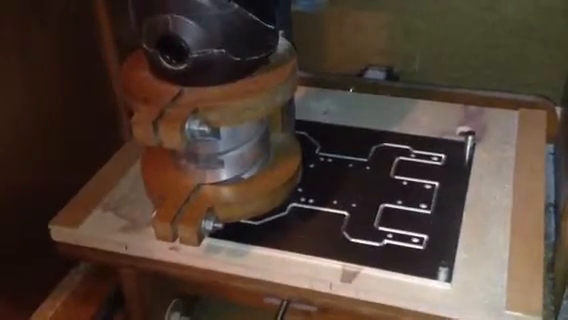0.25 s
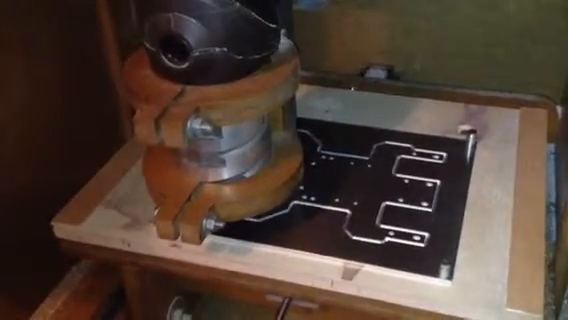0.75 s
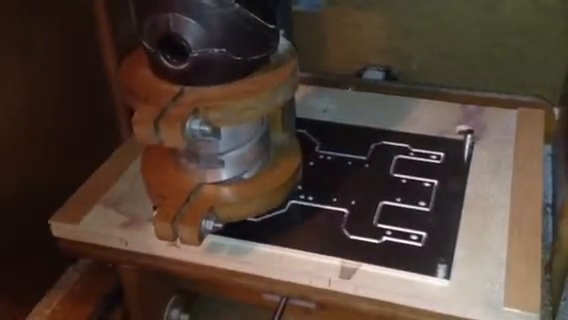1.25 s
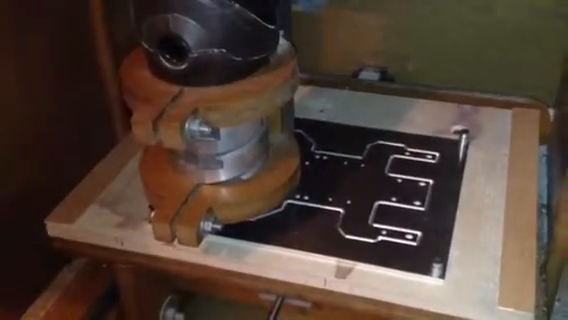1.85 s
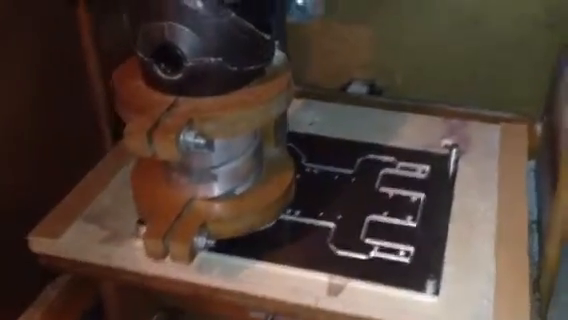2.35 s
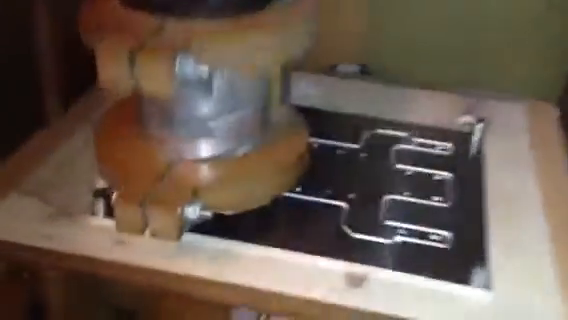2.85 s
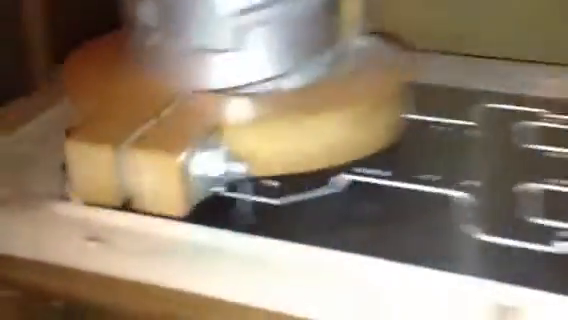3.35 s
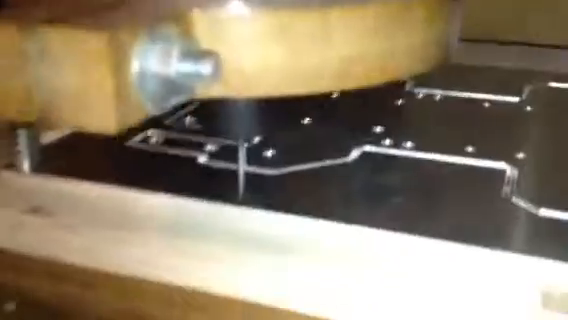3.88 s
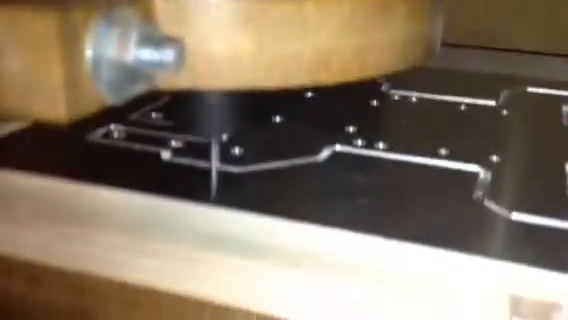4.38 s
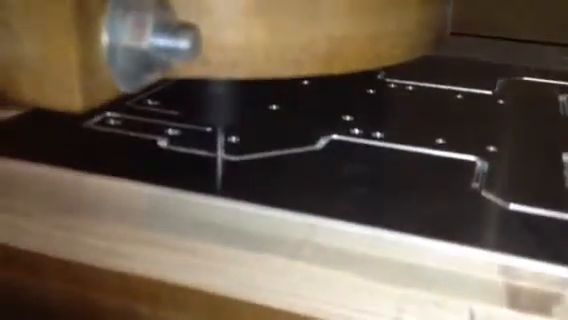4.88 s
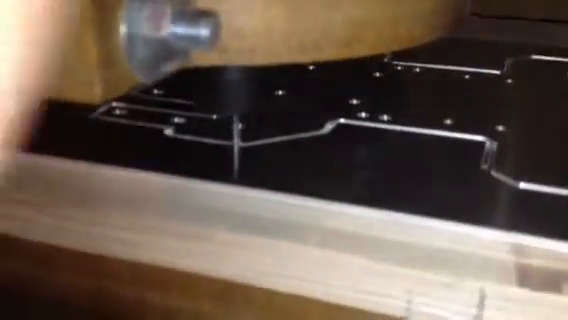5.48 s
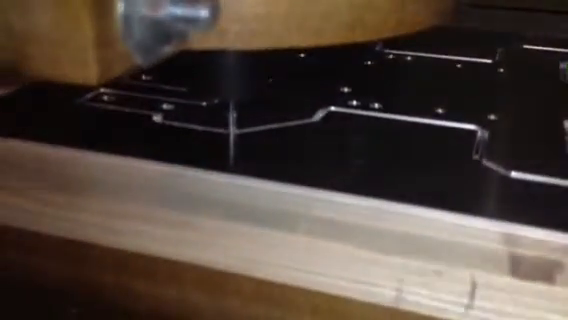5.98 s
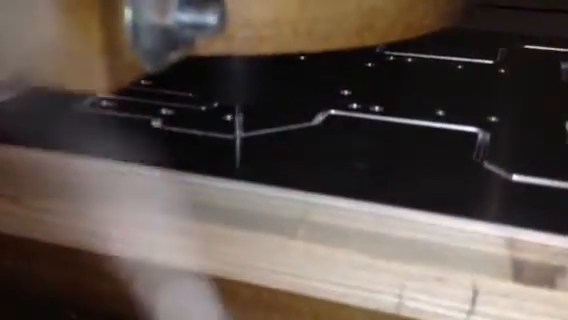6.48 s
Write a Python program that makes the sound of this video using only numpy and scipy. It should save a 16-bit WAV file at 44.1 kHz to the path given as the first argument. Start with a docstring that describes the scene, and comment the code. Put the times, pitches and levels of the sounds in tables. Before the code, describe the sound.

A small router mills aluminium sheet continuously, close and loud in a boxy wooden enclosure. A steady low hum near 300 Hz sits under a high, wavering whine and dense rasping hiss. Feed motors briefly sing in gliding tones early on. Midway the handheld microphone moves in to the cutter, shifting the tones and roughness; late on there are soft dull bumps and another short motor note.

```python
"""A mains-fed router spindle hums and whines at about 18000 rpm as a small mill cuts aluminium sheet.
Its tones are sines on multiples of a slightly hunting turning rate, with side tones from torque ripple.
The cut is filtered noise pulsed once a turn: frame rumble, rasp and cooling air, with ringing resonances.
Two feed motors sing through the curves as gliding tones, and soft bumps come from a hand on the microphone.
Half-way the microphone moves in close to the cutter, which rebalances the tones and recolours the cut."""
import sys
import numpy as np
from scipy import signal
from scipy.fft import rfft, irfft, next_fast_len
from scipy.io import wavfile
from scipy.ndimage import uniform_filter1d, map_coordinates

SR = 44100
rng = np.random.default_rng(int(sys.argv[2]) if len(sys.argv) > 2 else 0)


def file_out(sig):
    """Save sig as 16-bit WAV at sys.argv[1]."""
    # one column per channel
    cols = np.atleast_2d(sig).T
    # limit, then scale
    lim = np.clip(cols, -1, 1)
    pcm = np.round(lim * 32767).astype(np.int16)
    wavfile.write(sys.argv[1], SR, pcm)


N = 296793
TIME = np.arange(N) / SR  # s

TURN_HZ = 300.93  # mean turning rate of the shaft
HUNT_HZ, HUNT_RATE = 0.33, 9  # spread of the hunting in Hz, random knots per second
RIPPLE_HZ = 120  # torque ripple, twice the mains rate
FEED_HZ = 3300  # step tone of a motor that carries the whole feed
MOVE_FADE_S = 0.044
RELEASE_S = 0.033  # time for a surge of load to let go
AIR_LOAD = 0.65  # dB of hiss per dB of load
TOP_HZ = 15330  # band limit of the recorder

# Microphone position. Each row: time in seconds, closeness (0 = back from the machine, 1 = at the cutter).
CLOSENESS = [(0, 0), (1.7, 0.013), (2.6, 0.23), (3.3, 0.64), (4.1, 0.93), (6.73, 0.99)]
# Unbalance hum. Each row: time in seconds, level in dB.
HUM_LEVEL = [(0.02, -19), (0.13, -20), (0.22, -15), (0.41, -17), (0.76, -15), (1.64, -15), (1.97, -19),
             (2.01, -22), (2.05, -22), (2.21, -19.5), (2.66, -20), (3.46, -17.5), (4.09, -20.5),
             (5.16, -18), (5.21, -20), (6.18, -16.5), (6.27, -19), (6.7, -17)]
# Low shaft orders. Each row: time in seconds, then levels in dB of the 2nd, 3rd and 4th orders
# and of the ripple side tone just under the 4th.
GROWL_LEVELS = [(0, -41, -36, -27, -38), (.12, -39, -35, -23.5, -26), (.37, -45, -41, -41, -31),
                (.72, -33.5, -28.5, -24, -28), (1.33, -38, -42, -42, -32), (1.96, -36.5, -29, -27, -28),
                (2.3, -40, -29, -27, -32), (2.72, -41, -28.5, -32, -23), (3.12, -28.5, -28, -32, -24.5),
                (3.6, -29.5, -26, -31, -40), (4.2, -34, -29, -31.5, -33), (5.7, -34, -28.5, -37, -31.5),
                (6.15, -35, -29, -23, -31), (6.73, -39, -23, -33, -30)]
# Orders that swell and fade most. Each row: time in seconds, levels in dB of the 5th, 7th and 23rd.
WHINE_LEVELS = [(0.02, -32, -33, -25), (.42, -37, -29, -26.5), (1.15, -29, -23, -29),
                (1.95, -33.5, -24, -27), (2.45, -29, -23, -26), (2.6, -33, -26.5, -19),
                (2.8, -22, -29, -28), (2.95, -30, -18.5, -27), (3.12, -32, -30, -26),
                (3.33, -30, -22.5, -24), (3.55, -23.5, -24, -23), (3.95, -27.5, -34.5, -17.5),
                (4.33, -23.5, -29, -23), (4.68, -22, -28.5, -19), (5.27, -23, -28, -23.5),
                (5.75, -22, -28.5, -17), (6.12, -31.5, -31, -21), (6.73, -28, -31, -22)]
# Other shaft orders. Each row: multiple of the turning rate, level in dB from afar, level in dB close.
STEADIER_ORDERS = [(6, -35.5, -35), (8, -61, -30), (9, -37, -46), (10, -35.5, -39.5), (11, -35, -56),
                   (12, -31.5, -31.5), (14, -40, -42), (15, -38, -43), (16, -41, -39), (18, -34.5, -40),
                   (19, -34.5, -29.5), (22, -28, -32.5), (24, -34, -36), (25, -35, -37), (26, -30.5, -45),
                   (28, -38, -38), (29, -42, -49), (30, -36, -42), (32, -56, -56), (34, -41, -41),
                   (36, -37, -47), (38, -51, -38.5), (41, -44, -51), (43, -48, -39), (46, -40, -38),
                   (48, -37, -47)]
# Torque-ripple side tones. Each row: shaft multiple, ripple multiple, level in dB from afar, in dB close.
RIPPLE_TONES = [(0, 1, -66, -66), (0, 3, -46, -46), (0, 6, -44, -46), (3, -1, -51, -38), (12, -3, -47, -44),
                (12, -1, -40, -50), (12, 2, -43, -41), (12, 3, -43, -50)]
# Frame and bed shaken by the cut, from afar and close. Each row: frequency in Hz, relative dB per Hz.
FRAME_FAR_SPECTRUM = [(40, -60), (100, -40), (150, -21.5), (250, -16.5), (330, -10.5), (560, -11.5),
                      (660, -3.5), (950, -7), (1070, 2.5), (1500, -1), (1900, -1), (2500, -3.5),
                      (3200, -5.5), (5000, -33)]
FRAME_CLOSE_SPECTRUM = [(40, -56), (90, -53), (150, -17), (250, -15.5), (480, -13), (550, -18), (660, -2),
                        (1000, 1), (1350, -2), (1560, 1), (2100, -0.5), (2500, -7), (3200, -10.5),
                        (5000, -34)]
# Rasp of chips, from afar and close. Each row: frequency in Hz, relative dB per Hz.
RASP_FAR_SPECTRUM = [(1200, -41), (2400, -9), (3200, -4.5), (3800, 3), (4200, 1), (4550, 4.5), (5000, 0),
                     (5800, 0.5), (6600, 2), (7200, 2.5), (7700, 0), (8100, -1.5), (9400, -10),
                     (12000, -38)]
RASP_CLOSE_SPECTRUM = [(1200, -42), (2400, -7), (3000, -1.5), (3400, -5.5), (3750, 1), (4000, -0.5),
                       (4400, 4.5), (4900, 1.5), (5500, 0.5), (6200, 0.5), (7300, -1), (8500, -5.5),
                       (9400, -9.5), (12000, -45)]
# Cooling air. Each row: frequency in Hz, relative dB per Hz.
AIR_SPECTRUM = [(3000, -43), (7000, -9), (9000, -3), (10000, -2.5), (11500, 1), (12700, 1), (14000, -4),
                (15300, -7)]
# Air hiss under no extra load. Each row: time in seconds, level in dB.
AIR_LEVELS = [(0, -26.5), (1.5, -25.5), (2.5, -25.5), (3.05, -27.5), (3.7, -26.3), (4.3, -27.3), (5.2, -27),
              (5.9, -24), (6.73, -25.2)]
# Layers of the cut. Each holds: level in dB from afar, level in dB close, dB per dB of load.
FRAME_LEVELS = (-22.5, -21.5, 0.65)
RASP_LEVELS = (-18.5, -19, 1.03)
# Load builds as chips pack the slot, then lets go.
# Each row: start of release in seconds, build-up in seconds, strength in dB.
LOAD_SURGES = [(1.58, .15, 2), (2.01, 0.54, 1.2), (2.5, .2, 1.7), (3.02, 0.34, 3), (4.0, 1, 2.5),
               (4.6, .25, 1.1), (5.19, 0.56, 2.5), (5.8, 0.34, 3.4), (6.2, 0.27, 2.5), (6.73, 0.5, 2.5)]
# Sheet and cutter resonances. Each row: start and end in seconds, centre in Hz, width in Hz,
# level in dB before the swell.
RESONANCES = [(0, 2.65, 1260, 60, -29), (.16, 0.49, 4480, 90, -20), (.2, .52, 5400, 1500, -21),
              (.6, 1.45, 7580, 260, -24), (1.4, 2.2, 7650, 650, -27), (2.4, 2.9, 5720, 80, -27),
              (3.3, 4.08, 4640, 700, -24.5), (4.3, 4.9, 4340, 200, -35), (3.5, 6.4, 774, 45, -37),
              (6.37, 6.63, 6025, 70, -19)]
# Stretches where a stepper sings. Each row: start and end in seconds, angle of the path to the motor's
# axis in degrees at the start and at the end, level in dB before the fades.
FEED_MOVES = [(0, .17, 54, 71, -27), (.71, .92, 9, 21, -27.5), (.87, 1.06, 68, 58, -24),
              (.99, 1.32, 28, 46, -27.5), (6.17, 6.39, 60.6, 61.4, -27), (6.41, 6.78, 45, 45, -32)]
# Soft bumps of the hand on the microphone. Each row: time of the peak in seconds, level in dB.
HAND_BUMPS = [(4.74, -44), (5.365, -36.5), (6.15, -39)]
# Early echoes off the table and the wooden housing. Each row: delay in milliseconds, gain.
WALL_ECHOES = [(1.7, .13), (3.1, .13), (4.9, .12), (7.6, .11)]


def amp(db):
    """A level in decibels is twenty times the logarithm of an amplitude ratio."""
    return 10 ** (np.asarray(db) / 20)


def unit(x):
    """Division by the root mean square leaves an rms of 1."""
    return x / np.sqrt(np.mean(x ** 2) + 1e-20)


def curves(rows):
    """Linear interpolation gives one value per sample for each column after the time."""
    seconds, *columns = np.transpose(rows)
    return [np.interp(TIME, seconds, column) for column in columns]


def between(far_db, close_db, close):
    """The level in dB follows the closeness of the microphone linearly."""
    return far_db + (close_db - far_db) * close


def wobble(rate):
    """A spline through normal random knots, rate knots a second, is a smooth random modulation."""
    knots = rng.standard_normal(int(N * rate / SR) + 4)
    coarse = TIME[::32]
    return np.interp(TIME, coarse, map_coordinates(knots, [coarse * rate]))


def start():
    """A tone of unknown phase starts at a uniformly random angle."""
    return rng.uniform(0, 2 * np.pi)


def filtered(x, response):
    """A linear filter multiplies the spectrum by a response of frequency."""
    size = next_fast_len(N + SR // 2)
    return irfft(rfft(x, size) * response(np.fft.rfftfreq(size, 1 / SR)), size)[:N]


def noise(spectrum):
    """White noise shaped by (Hz, dB) points, joined on a logarithmic frequency axis, has rms 1."""
    points_hz, points_db = np.transpose(spectrum)

    def response(hz):
        return amp(np.interp(np.log(hz + 1), np.log(points_hz), points_db))

    return unit(filtered(rng.standard_normal(N), response))


def tone(phase, rough, flutter_rate, drift_db):
    """Uneven chips modulate a sine in amplitude and phase while its level drifts; its rms is 1."""
    shake = rough / np.sqrt(2)
    in_phase = (1 + shake * wobble(flutter_rate)) * np.sin(phase)
    quadrature = shake * wobble(flutter_rate) * np.cos(phase)
    return unit((in_phase + quadrature) * amp(drift_db * wobble(3.0)))


def patchy(x, depth_db):
    """Chips catch and clear, so narrow bands flare for a few hundredths of a second."""
    bands = signal.stft(x, nperseg=512)[2]
    field = uniform_filter1d(rng.standard_normal(bands.shape), size=4, axis=0)  # along frequency
    field = uniform_filter1d(field, size=12, axis=1)  # along time
    flaring = bands * amp(depth_db * unit(field))
    return unit(signal.istft(flaring, nperseg=512)[1][:N])


def swelling(begin, end, fade_s):
    """A linear envelope rises from the start and falls to the end, with a ceiling of 1."""
    return np.clip(np.minimum(TIME - begin, end - TIME) / fade_s, 0, 1)


def air_rush(bite, load_db):
    """Turbulent cooling air is broadband hiss, which the bite and the load modulate."""
    level_db = curves(AIR_LEVELS)[0] + AIR_LOAD * load_db
    hiss = patchy(noise(AIR_SPECTRUM) * (1 + 0.1 * bite), depth_db=1.5)
    return hiss * amp(level_db + 0.35 * wobble(35))


def handling():
    """Contact through the microphone's case transmits dull, low-frequency bumps."""
    push = sum(amp(db) * np.exp(-((TIME - peak_s) / 0.017) ** 2) for peak_s, db in HAND_BUMPS)
    return push * noise([(40, -28), (110, 2), (160, 9), (230, 4), (450, -37)])


def feed_motors():
    """A stepper's pitch is proportional to the cosine of the path's angle, its share of the feed."""
    out = np.zeros(N)
    for begin, end, first_deg, last_deg, db in FEED_MOVES:
        path_deg = np.interp(TIME, [begin, end], [first_deg, last_deg])
        hz = FEED_HZ * np.cos(np.radians(path_deg))
        phase = 2 * np.pi * np.cumsum(hz) / SR
        song = tone(phase, rough=0.37, flutter_rate=63, drift_db=1.0)
        out += amp(db) * swelling(begin, end, MOVE_FADE_S) * song
    return out


def chatter():
    """A resonance of sheet or cutter selects a narrow band, here and there along the path."""
    out = np.zeros(N)
    for begin, end, centre_hz, width_hz, db in RESONANCES:
        ring = filtered(rng.standard_normal(N), lambda hz: 1 / (1 + (2 * (hz - centre_hz) / width_hz) ** 2))
        out += amp(db) * swelling(begin, end, 0.15) * unit(ring)
    return out


def load():
    """Extra load on the cutter in dB is a sawtooth: each surge climbs steadily and drops quickly."""
    return sum(db * np.interp(TIME, [release - build, release, release + RELEASE_S], [0, 1, 0])
               for release, build, db in LOAD_SURGES)


def heard(far_spectrum, close_spectrum, close):
    """Powers of independent noises add, so square-root weights cross-fade the far and close colours."""
    far = np.sqrt(np.clip(1 - close, 0, 1)) * noise(far_spectrum)
    near = np.sqrt(np.clip(close, 0, 1)) * noise(close_spectrum)
    return far + near


def frame_rumble(bite, load_db, close):
    """The cutting force excites frame and bed as low broadband noise, pulsed by the bite."""
    far_db, close_db, load_share = FRAME_LEVELS
    level_db = between(far_db, close_db, close) + load_share * load_db
    shaken = heard(FRAME_FAR_SPECTRUM, FRAME_CLOSE_SPECTRUM, close) * (1 + 0.075 * bite)
    return patchy(shaken, depth_db=1.47) * amp(level_db + 0.47 * wobble(30))


def chip_rasp(bite, load_db, close):
    """The tearing of chips radiates higher broadband noise, pulsed by the bite."""
    far_db, close_db, load_share = RASP_LEVELS
    level_db = between(far_db, close_db, close) + load_share * load_db
    torn = heard(RASP_FAR_SPECTRUM, RASP_CLOSE_SPECTRUM, close) * (1 + 0.12 * bite)
    return patchy(torn, depth_db=1.5) * amp(level_db + 0.44 * wobble(35))


def housing(x):
    """Delayed reflections from nearby boards interfere with the direct sound and ripple its spectrum."""
    return filtered(x, lambda hz: 1 + sum(gain * np.exp(-2j * np.pi * hz * ms / 1000)
                                          for ms, gain in WALL_ECHOES))


def cutting(angle, close):
    """The edge tears off a chip every turn, a periodic pulse that modulates rumble, rasp and air alike."""
    load_db = load()
    pulse = ((1 + np.cos(angle)) / 2) ** 6
    bite = pulse * amp(2.8 * wobble(300))  # chips of uneven size
    cut = frame_rumble(bite, load_db, close) + chip_rasp(bite, load_db, close) + air_rush(bite, load_db)
    return housing(cut) * amp(0.25 * wobble(12))


def buzz(angle, close):
    """Torque pulses at twice the mains rate give tones at sums and differences with the shaft orders."""
    ripple = 2 * np.pi * RIPPLE_HZ * TIME
    side_db = curves(GROWL_LEVELS)[-1]
    out = amp(side_db) * tone(4 * angle - ripple, rough=0.46, flutter_rate=30, drift_db=0.8)
    for order, step, far_db, close_db in RIPPLE_TONES:
        level = amp(between(far_db, close_db, close))
        phase = order * angle + step * ripple + start()
        out += level * tone(phase, rough=0.35, flutter_rate=22, drift_db=3.0)
    return out


def growl(angle):
    """The low harmonics of the rotation stay fairly clean, with little random modulation."""
    second_db, third_db, fourth_db, _ = curves(GROWL_LEVELS)
    out = amp(second_db) * tone(2 * angle + start(), rough=0.26, flutter_rate=30, drift_db=0.5)
    out += amp(third_db) * tone(3 * angle + start(), rough=0.21, flutter_rate=30, drift_db=1.5)
    out += amp(fourth_db) * tone(4 * angle + start(), rough=0.38, flutter_rate=30, drift_db=1.0)
    return out


def whine(angle, close):
    """Cutter, commutator and fan are periodic in the turn, so they sound on its whole multiples."""
    fifth_db, seventh_db, piercing_db = curves(WHINE_LEVELS)
    out = amp(fifth_db) * tone(5 * angle + start(), rough=0.6, flutter_rate=95, drift_db=0.5)
    out += amp(seventh_db) * tone(7 * angle + start(), rough=0.52, flutter_rate=120, drift_db=0.5)
    twentieth_db = between(-30.5, -29.0, close) + 1.8 * wobble(9)
    out += amp(twentieth_db) * tone(20 * angle + start(), rough=1.5, flutter_rate=110, drift_db=1.5)
    waver_db = between(3.1, 0.8, close) * wobble(14)  # the piercing 23rd steadies close to the cutter
    piercing = tone(23 * angle + start(), rough=0.25, flutter_rate=42, drift_db=0.9)
    out += amp(piercing_db + waver_db) * piercing
    for order, far_db, close_db in STEADIER_ORDERS:
        level = amp(between(far_db, close_db, close))
        rough = 0.17 + 0.04 * order  # higher orders feel the uneven chips more
        out += level * tone(order * angle + start(), rough=rough, flutter_rate=45, drift_db=1.6)
    return out


def hum(angle):
    """An unbalanced rotor exerts a force once a turn, which shakes the frame at the turning rate."""
    level_db, = curves(HUM_LEVEL)
    dip = amp(-13 * np.exp(-((TIME - 2.013) / 0.009) ** 2))  # the hum dips once for an instant
    return amp(level_db) * dip * tone(angle, rough=0.035, flutter_rate=40, drift_db=0.1)


def scene():
    """One shaft angle, the integral of its hunting speed, drives spindle and cut; all sources add."""
    speed_hz = TURN_HZ + HUNT_HZ * wobble(HUNT_RATE)
    angle = 2 * np.pi * np.cumsum(speed_hz) / SR
    close, = curves(CLOSENESS)
    background = handling() + feed_motors() + chatter()
    spindle = buzz(angle, close) + growl(angle) + whine(angle, close) + hum(angle)
    mono = background + cutting(angle, close) + spindle
    return np.array([mono] * 2)  # a single microphone on both channels


def record(dry):
    """A band-limited recorder keeps nothing above its upper frequency."""
    return np.array([filtered(channel, lambda hz: hz < TOP_HZ) for channel in dry])


dry = scene()
out = record(dry)
file_out(out)
```